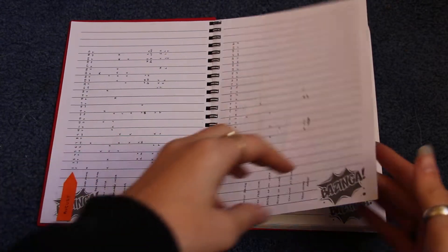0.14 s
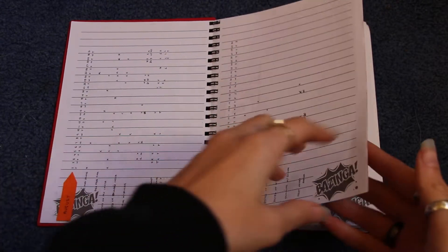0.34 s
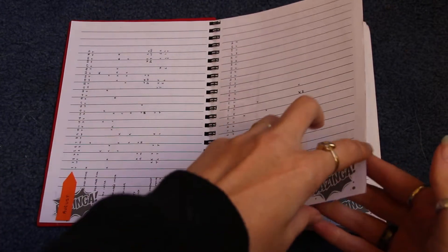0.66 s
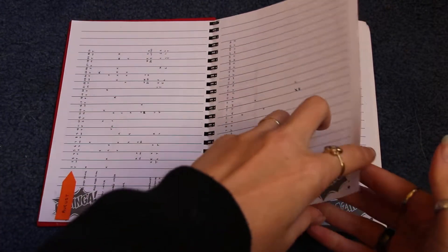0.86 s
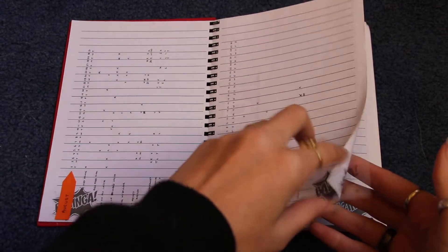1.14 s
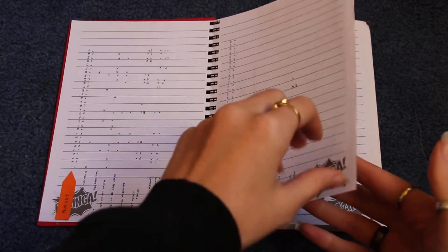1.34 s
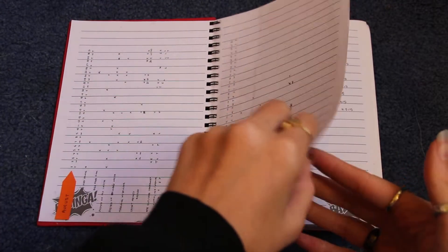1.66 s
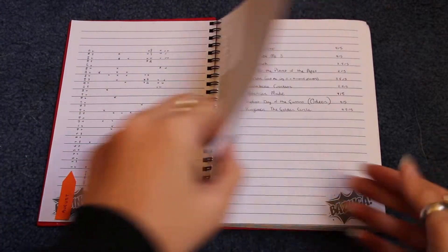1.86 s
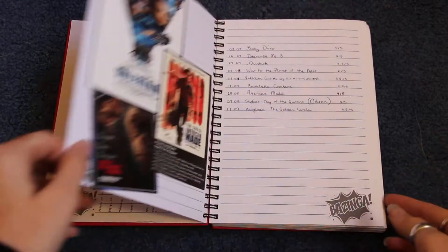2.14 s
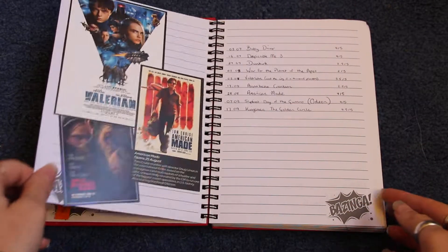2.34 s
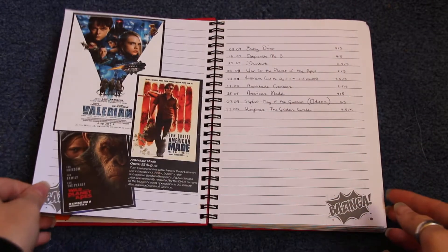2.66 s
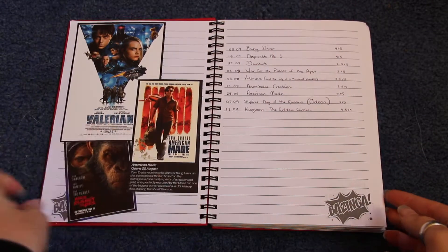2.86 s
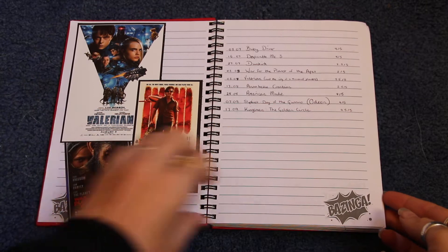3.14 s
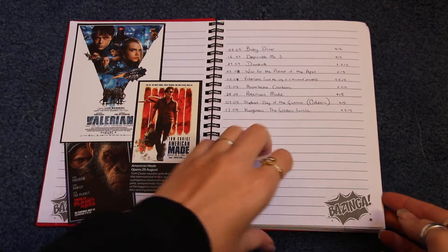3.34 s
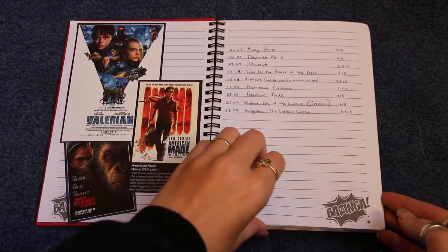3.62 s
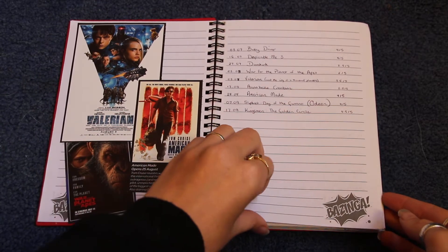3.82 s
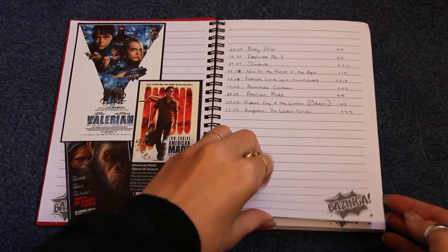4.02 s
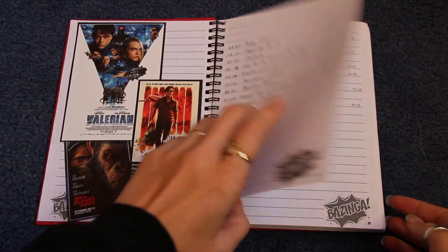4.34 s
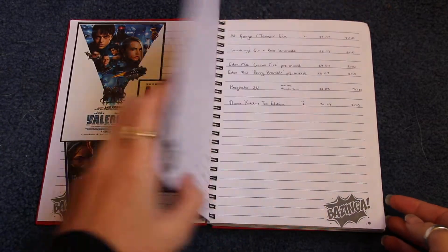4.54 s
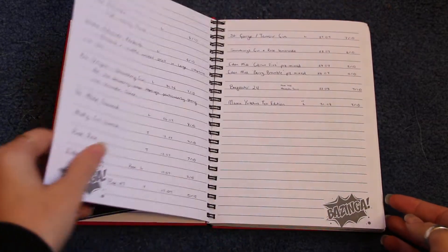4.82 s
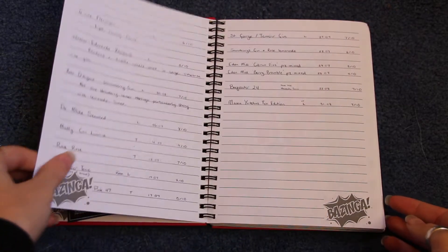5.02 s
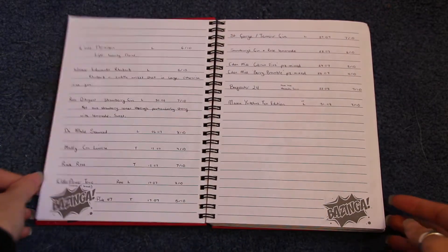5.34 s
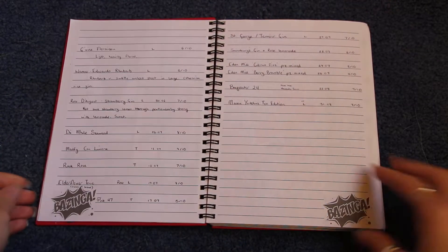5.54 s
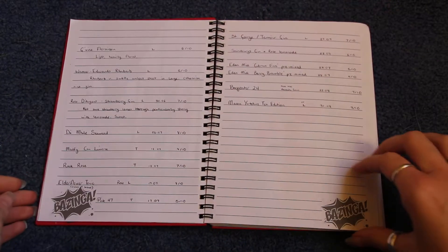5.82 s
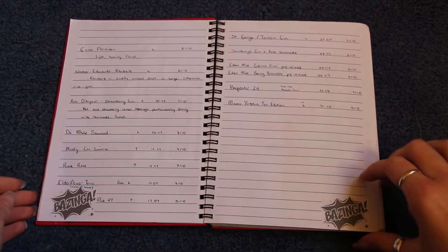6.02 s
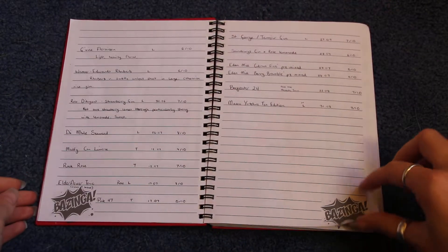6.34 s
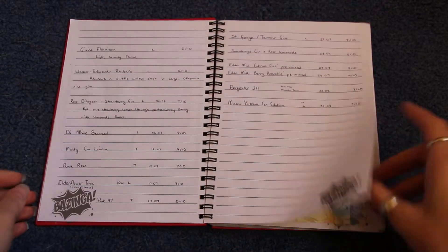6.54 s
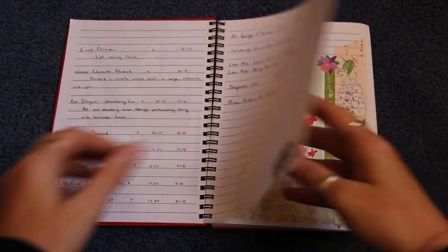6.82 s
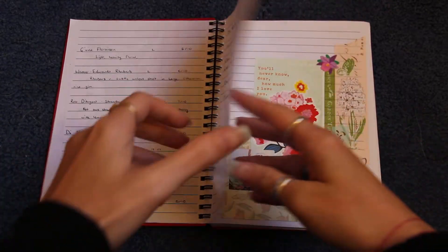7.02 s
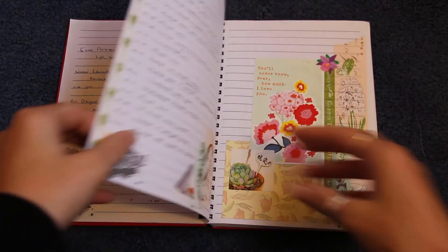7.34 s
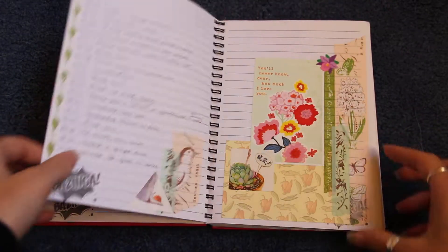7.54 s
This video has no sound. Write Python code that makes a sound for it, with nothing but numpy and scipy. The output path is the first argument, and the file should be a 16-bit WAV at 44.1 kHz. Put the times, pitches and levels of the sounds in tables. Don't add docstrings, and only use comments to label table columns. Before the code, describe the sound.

Close papery swishes, crackles and crisp flaps of three turning notebook sheets, over steady low hum and soft microphone hiss.

```python
import sys
import numpy as np
from scipy import signal
from scipy.fft import rfft, irfft
from scipy.io import wavfile
from scipy.ndimage import uniform_filter1d

SR = 44100
rng = np.random.default_rng(int(sys.argv[2]) if len(sys.argv) > 2 else 0)


def int16_out(signal):
    q = np.round(np.clip(np.atleast_2d(signal).T, -1, 1) * 32767)
    wavfile.write(sys.argv[1], SR, q.astype(np.int16))


def voltage_ratio(level):
    return 10 ** (np.asarray(level, float) / 20)


N = 338247

# frequency_hz, density_db
FLOOR_SPECTRUM = [(15, -58), (33, -21.5), (64, -13), (96, -4.5), (144, -8.5), (188, -6), (349, -11.5),
                  (804, -11.5), (895, -13.5), (970, -13), (1850, -16.5), (5140, -22.5), (15500, -35)]
# frequency_hz, likeness (-1 to 1)
FLOOR_LIKENESS = [
    (28, -0.1),
    (60, 0.88),
    (180, 0.016),
    (550, -0.24),
    (1650, -0.46),
    (4970, -0.3),
    (15000, -0.1),
]
# centre_hz, width_hz, level_db
MOTOR_RUMBLE = [
    (95, 26, -80),
    (176, 33, -76.5),
]

# low_hz, high_hz, grain_share (0-1), trim_db, stereo_width (0-1)
RUB_BANDS = [
    (300, 760, 0.02, -4, 0.2),
    (900, 2650, 0.26, 0, 0),
    (2150, 5970, 0.28, -2, 0.5),
    (5800, 12500, 0.14, -10, 1),
]
# peak_s, rise_s, fall_s, peak_db, brightness_db
PAGE_SLIDES = [(.088, 0.29, 0.15, -58.5, 1), (.58, 0.11, 0.022, -63, -6), (.63, .04, 0.17, -60.5, -1),
               (.864, 0.082, 0.023, -59, -8), (1.116, .4, 0.11, -62, 9),
               (1.186, 0.096, .02, -45.5, 6.5), (1.2, 0.012, 0.043, -32.5, -11.5),
               (1.533, .006, 0.034, -50, 12.5), (1.655, 0.17, 0.24, -52.5, -1),
               (1.757, .1, .03, -65, 1), (1.83, 0.087, 0.33, -67, -1), (1.99, 0.43, 0.14, -62.5, 8),
               (2.172, 0.52, 0.12, -63.5, 4), (2.23, 0.15, .03, -53.5, 1),
               (2.266, 0.035, 0.13, -48.5, 5.5), (2.498, 0.26, 0.021, -58.5, -2),
               (2.644, 0.1, 0.15, -53.5, 3.5), (2.84, 0.14, 0.04, -43, 6),
               (2.87, 0.12, 0.016, -52, 26),
               (3.368, 0.019, 0.023, -66, 16), (3.444, 0.029, 0.13, -54, -3),
                      (3.58, .15, 0.024, -56.5, -7), (4.044, 0.19, 0.098, -59.5, 7),
                      (4.185, 0.094, 1, -57.5, 7), (4.357, 0.019, .2, -56, 15),
                      (4.405, 0.085, 0.13, -52.5, 4), (4.535, 0.033, 0.029, -50.5, 6),
                      (4.6, .15, 0.084, -75, 13), (4.72, 0.066, 0.073, -53.5, -4),
                      (4.754, 0.011, 0.057, -59, 2), (4.871, 0.14, 0.15, -59.5, 4),
                      (5.0, 0.13, 0.15, -55, -9), (5.06, 0.28, 0.28, -54, -2),
                      (5.198, 0.45, 0.12, -49.5, 12.5), (5.33, 0.31, 0.07, -50, 15),
               (5.584, 0.15, 0.53, -59, 6), (5.727, 0.18, 0.75, -66, -6),
                     (5.874, 0.055, 0.091, -57, 0), (6.02, 0.05, 0.073, -57.5, -5),
                     (6.238, 0.089, 0.028, -61.5, -4), (6.316, 0.0053, 0.15, -58, -3),
                     (6.41, 0.021, 0.21, -60.5, 18), (6.456, 0.051, 0.011, -46, 12),
                     (6.574, 0.1, 0.3, -61, 15), (6.8, 0.04, 0.16, -57, 0), (6.858, .012, .045, -49, -8),
                     (6.89, 0.11, 0.31, -64.5, -7), (7.145, 0.18, 0.3, -56, 4),
                     (7.232, 0.073, 0.17, -61, -12), (7.298, 0.075, 0.021, -54.5, 0),
                     (7.44, .1, 0.018, -68, 6), (7.509, 0.054, 0.063, -48.5, -8),
                     (7.568, 0.045, 0.18, -49.5, 0), (7.66, .1, .1, -67, 2)]
# peak_s, rise_s, fall_s, peak_db
PAGE_BENDS = [(.088, 0.27, .15, -64), (.582, 0.18, 0.018, -55), (.914, .02, .35, -59),
              (1.196, 0.012, 0.029, -35), (1.535, 0.0091, 0.031, -40), (1.615, 0.089, .3, -55),
              (1.757, .3, .03, -59), (1.811, 0.09, 0.15, -57), (2.019, 0.03, 0.023, -49),
              (2.28, .05, 0.54, -56.5), (2.528, 0.079, 0.12, -49.5), (2.84, .13, .06, -61),
              (3.368, 0.022, 0.016, -50.5), (3.45, .08, .3, -66), (3.58, 0.22, .03, -50),
                    (4.185, 0.07, 1.2, -57), (4.405, 0.12, 0.092, -56), (4.535, 0.018, 0.08, -51),
                    (4.72, 0.075, 0.11, -45.5), (4.99, 0.082, 0.03, -43), (5.964, 1, .02, -53.5),
                    (6.02, .1, 0.2, -54.5), (6.238, .2, 0.011, -59), (6.458, 0.06, 0.035, -54),
                    (6.81, 0.036, 0.11, -50.5), (7.158, 0.016, 0.1, -46.5), (7.232, .03, 0.15, -45.5),
                    (7.298, 0.22, 0.064, -54), (7.41, 0.12, 0.11, -52.5), (7.51, 0.063, 0.087, -55),
                    (7.66, .3, .2, -51)]
# peak_s, rise_s, fall_s, peak_db
FINGER_WIPES = [(1.192, 0.014, .012, -39), (1.99, .3, .06, -64), (2.25, .3, 0.25, -57),
                (3.9, 0.72, 0.54, -67.5), (4.629, .06, .08, -52), (4.78, 0.21, 0.28, -61),
                (5.145, .01, 0.4, -48), (5.33, 0.27, 0.053, -47), (5.726, 0.15, 0.55, -56),
                (6.404, 0.007, 0.06, -40), (6.458, 0.077, 0.013, -43), (7.136, .15, .05, -61),
                (7.298, .06, .06, -63)]
# time_s, peak_spacing_hz, strength (0-1)
GAP_PATH = [(.95, 1550, 0), (1.02, 1580, 0.5), (1.18, 1670, 0.4), (1.2, 1720, 0), (2.3, 1300, 0),
            (2.45, 1410, 0.6), (2.8, 1370, 0.06), (3.3, 1190, 0), (4.2, 1990, 0.48), (4.5, 2280, 0),
            (4.98, 1410, 0.08), (5.358, 1430, 0.2), (5.45, 550, 0.25), (6.1, 554, 0.1), (6.3, 1600, 0),
            (6.5, 3300, 0), (6.7, 2600, 0.2), (6.9, 1410, 0.1)]

# start_s, peak_db, crease_hz, sheet_re_peak_db, sheet_hz
BUCKLES = [(.3825, -57.5, 1620, 4, 447), (0.6246, -39, 2650, -26, 630), (0.8815, -37.5, 2420, -20, 571),
           (1.211, -27, 2340, -12, 1070), (1.534, -32, 2300, -11, 1050), (1.709, -35.5, 2620, -28, 604),
           (1.746, -35, 2100, -31, 552), (4.1992, -33, 1940, -32, 316), (4.5304, -34, 3370, -16, 953),
           (4.551, -42, 3500, -14, 1100), (4.603, -44, 3500, -14, 1900), (4.6328, -48.5, 1800, 6, 1250),
           (4.6966, -36, 4250, -13, 950), (4.7102, -35, 2650, -20, 890), (6.311, -40, 2300, -31, 1180),
           (6.7975, -38, 5500, -17, 406), (7.149, -31, 2920, -16, 900), (7.236, -50, 2270, 1.5, 565),
           (7.2592, -37, 3400, -16, 550), (7.292, -47.5, 1890, 5.5, 1280), (7.5435, -40, 1800, -1, 1420)]
# start_s, peak_db, crease_hz, sheet_re_peak_db, sheet_hz
POPS = [(.448, -33, 2480, -12.5, 417), (.633, -40, 2090, -12.5, 850), (1.1921, -20, 4900, -19.5, 372),
        (1.1981, -15.5, 3720, -10, 1400), (1.203, -17, 930, -23, 890), (1.2223, -34, 2270, -29, 1520),
        (1.529, -33, 1480, -17, 900), (2.2638, -35, 4980, -14, 1550), (2.8726, -31, 2400, -34, 990),
        (4.171, -33, 5300, -14, 2900), (4.178, -39, 5000, -20, 2900), (6.8461, -29, 2100, -8, 1520),
        (7.4059, -39, 4740, 1, 710), (7.4135, -31.5, 4060, -3.5, 980), (7.513, -31.5, 2000, -3.5, 1180),
        (7.5569, -28.5, 2000, -7, 1200), (7.5691, -28, 1810, -8.5, 1050), (7.5837, -28, 2400, -16, 966),
        (7.606, -31, 2100, -7.5, 1300), (1.5783, -39, 2270, -14, 1300), (1.6557, -39, 2400, -15, 1050),
        (1.6636, -37, 2350, -20, 1100), (1.693, -39, 2400, -20, 1100), (1.8931, -40, 3500, -15, 1570),
        (1.9295, -45, 2900, -25, 1500), (2.4697, -42, 2800, -12, 1410), (2.6368, -42, 3000, -15, 1500),
        (4.727, -36, 2900, -13, 900), (7.221, -39, 2000, -8, 956), (7.271, -44, 1800, -5, 783),
        (7.286, -41, 1500, -5, 700), (7.481, -39.5, 1530, -11, 900), (7.496, -46, 2700, -12, 900),
        (0.821, -43, 2300, -20, 1500), (.903, -46, 2400, -25, 1500)]
# start_s, peak_db, crease_hz, sheet_re_peak_db, sheet_hz
CRISP_SNAPS = [(0.6764, -44, 2840, -27, 1170), (1.943, -42, 2920, -10, 1060), (2.051, -38, 2840, -26, 1010),
               (2.1041, -45.5, 5220, -8, 969), (2.1878, -40, 3380, -10, 1510),
               (2.2108, -32.5, 2730, -3.5, 1250), (2.3006, -35, 2480, -13, 1360),
               (2.3552, -25, 2320, -14, 990), (4.219, -45, 8500, -31, 1100),
               (4.4875, -40.5, 3570, -11, 1300), (4.5194, -41, 4500, -8, 2400),
               (4.5773, -48, 3160, -21, 900), (4.6151, -36, 2980, -26, 1040),
               (4.756, -28.5, 2300, -35, 1370), (4.8084, -25, 2780, -27, 1160),
               (4.9434, -23, 3300, -12, 1290), (6.4, -38.5, 1800, -14, 1570), (7.654, -44, 2870, -2, 950)]
CRACK_LEVELS = [
    -7,
    -18,
    -29,
]
SPRAY_RATIOS = [
    0.35,
    0.38,
    0.54,
]
# start_s, peak_db, mode_hz, width_hz
SHEET_MODES = [(0.3819, -41, 1530, 150), (.448, -39, 1300, 350), (1.192, -26, 4870, 500),
               (1.1925, -36, 8500, 500), (1.1985, -19, 3830, 250), (1.1985, -22, 4450, 250),
               (1.1983, -26, 370, 90), (1.222, -24, 2340, 250), (1.203, -26, 1060, 230),
               (1.534, -36, 1110, 150), (1.532, -39, 1600, 150), (1.534, -35.5, 2450, 300),
               (2.2102, -26.5, 1250, 350), (2.19, -35, 2500, 300), (2.211, -29, 2660, 400),
               (2.3556, -23, 2980, 600), (2.361, -30, 1620, 300), (2.357, -32, 560, 200),
               (2.357, -18, 2360, 220), (2.357, -23.5, 1500, 200), (2.357, -29, 950, 150),
               (2.357, -39, 3540, 250), (2.873, -32, 2310, 250), (4.577, -38, 3200, 300),
               (4.6335, -40, 1250, 260), (4.697, -26, 4830, 350), (4.696, -39, 4260, 250),
               (4.694, -32, 2100, 500), (4.712, -36, 650, 250), (4.757, -38.5, 2550, 200),
               (4.809, -27.5, 1040, 170), (4.809, -20, 1580, 300), (4.8093, -18, 2800, 350),
               (4.8096, -27, 2570, 350), (4.8093, -23.5, 2020, 300), (4.809, -15.5, 4330, 350),
               (4.809, -21, 4900, 400), (4.809, -20, 9200, 900), (4.9434, -13.5, 2460, 2600),
               (4.9433, -20.5, 6140, 2000), (4.9428, -24, 1560, 260), (4.9435, -24, 2800, 350),
               (4.9465, -21.5, 1490, 220), (4.945, -25.5, 1000, 300), (4.9432, -34, 3550, 300),
               (4.9432, -30, 4260, 300), (6.846, -37.5, 1420, 250), (6.849, -36, 1780, 150),
               (6.846, -33, 2470, 360), (7.406, -35, 4900, 500), (7.406, -30.5, 965, 150),
               (7.414, -37, 4760, 600), (7.655, -37.5, 950, 250), (7.291, -33.5, 1400, 300),
               (7.237, -39, 800, 400)]
# peak_s, rise_s, fall_s, peak_db, pitch_hz
AIR_POCKETS = [(1.03, .05, .05, -64, 4580), (1.04, .05, .04, -61, 1650), (1.125, .015, 0.2, -54, 1800),
               (1.13, .02, .1, -63, 4900), (1.17, .1, .03, -59, 3100), (1.18, .15, .03, -57, 8300),
               (1.63, 0.1, .05, -58, 1230), (1.665, .03, .1, -53, 2420), (1.73, .06, 0.11, -59, 2700),
               (2.47, 0.089, .04, -62, 1410), (2.55, .06, .05, -57, 867), (2.63, 0.079, 0.16, -53.5, 1410),
               (2.83, 0.12, .06, -46.5, 1470), (2.68, .08, .05, -62, 4150), (2.84, .06, .03, -55, 5480),
               (4.27, 0.11, 0.086, -55, 2440), (4.36, .04, .05, -58, 2500), (4.41, .08, .05, -56, 2120),
               (4.39, .08, .06, -60, 3900), (4.37, .04, .06, -57, 4800), (5.07, 0.11, .05, -53, 5500),
               (5.25, .2, 0.14, -58, 2870), (5.3, 0.15, .08, -51, 5400), (5.2, .15, .06, -56, 4050),
               (5.18, .08, .1, -58, 7400), (5.04, .1, .15, -57, 1650), (6.43, 0.054, .05, -51.5, 1520),
               (6.605, .12, .04, -58, 3150), (6.66, .08, .12, -62, 2400), (6.55, .08, .06, -60, 3660),
               (7.14, .08, .06, -58, 2270), (7.62, 0.065, 0.036, -49.5, 2500)]
# start_s, peak_db, decay_s
LANDINGS = [(1.535, -44.5, 0.024), (2.179, -51, 0.05), (2.356, -43.5, 0.028), (1.197, -53, 0.037),
            (2.521, -58, 0.084), (2.855, -52.5, 0.046), (4.7, -54, .05), (4.945, -52.5, 0.036),
            (5.376, -52, 0.066), (5.989, -49.5, 0.073), (6.859, -55, 0.044), (7.288, -51, 0.04)]

# delay_s, left_db, right_db
EARLY_ECHOES = [
    (.00097, -12, -13),
    (.0047, -17, -16),
    (.0102, -11, -12),
    (.0190, -16, -17),
]
# low_hz, high_hz, t60_s, level_db
ROOM_DECAY = [
    (245, 555, 0.15, 5.5),
    (720, 4100, 0.11, 6.5),
    (2600, 12400, 0.13, 7.5),
    (6960, 22000, 0.14, 2),
]


def rms_one(x):
    return x / np.sqrt(np.mean(x ** 2) + 1e-20)


def at_hz(points, hz):
    points_hz, values = np.transpose(points)
    return np.interp(np.log(hz), np.log(points_hz), values)


def band(x, low_hz, high_hz):
    edges_hz = [low_hz, min(high_hz, .45 * SR)]
    return signal.sosfilt(signal.butter(2, edges_hz, "band", fs=SR, output="sos"), x)


def dull(x, cut_hz):
    return signal.sosfilt(signal.butter(2, min(cut_hz, .45 * SR), fs=SR, output="sos"), x)


def resonate(x, hz, width_hz):
    r = np.exp(-np.pi * width_hz / SR)
    return signal.lfilter([1, 0, -1], [1, -2 * r * np.cos(2 * np.pi * hz / SR), r * r], x)


def stereo(mid, side):
    return mid + side * [[1], [-1]]


def drift(rate_hz):
    r = np.exp(-80 * np.pi * rate_hz / SR)
    white = rng.standard_normal(N // 40 + 2002)
    slow = signal.lfilter([1], [1, -2 * r, r * r], white)[2000:]
    return np.interp(np.arange(N) / 40, np.arange(len(slow)), rms_one(slow))


def strokes(rows, lean=0):
    edge_db = 20
    t = np.arange(0, N + 32, 32) / SR
    power = 1e-12
    for peak_s, rise_s, fall_s, peak_db, *bright_db in rows:
        away = np.where(t < peak_s, (peak_s - t) / rise_s, (t - peak_s) / fall_s)
        power = power + voltage_ratio(peak_db + lean * sum(bright_db) - edge_db * away) ** 2
    return np.interp(np.arange(N) / SR, t, power)


def floor_noise(level_db=-54.5, patchy_db=.4):
    out = 0
    edges_hz = 22 * 2 ** np.arange(0, 9.7, .4)
    white = rng.standard_normal((2, 2, N))
    for k, (low_hz, high_hz) in enumerate(zip(edges_hz, edges_hz[1:])):
        mid, side = band(white[k % 2], low_hz, high_hz)
        hz = np.sqrt(low_hz * high_hz)
        alike = at_hz(FLOOR_LIKENESS, hz)
        gain = voltage_ratio(at_hz(FLOOR_SPECTRUM, hz) + patchy_db * drift(16.0))
        out = out + gain * stereo(np.sqrt(1 + alike) * mid, np.sqrt(1 - alike) * side)
    return voltage_ratio(level_db) * rms_one(out)


def hum():
    t = np.arange(N) / SR
    out = np.zeros(N)
    for hz, level_db in [(101.2, -66), (90, -68)]:
        out += voltage_ratio(level_db + 1.3 * drift(4.5)) * np.sqrt(2) * np.sin(2 * np.pi * hz * t)
    for hz, width_hz, level_db in MOTOR_RUMBLE:
        noise = resonate(rng.standard_normal(N), hz, width_hz)
        out += voltage_ratio(level_db) * rms_one(resonate(noise, hz, width_hz))
    return out


def rubbing(grains_per_s=5100.0, clump_db=6.0, size_db=6.0):
    slides = PAGE_SLIDES
    rustle = strokes(slides, -0.39)
    swish = strokes(slides, 0.4)
    flex = strokes(PAGE_BENDS) + voltage_ratio(2 * -30) * rustle
    hiss = strokes(FINGER_WIPES) + voltage_ratio(2 * -10) * swish

    born = rng.random(N) < grains_per_s * voltage_ratio(clump_db * drift(30)) / SR
    grain_size = voltage_ratio(size_db * np.minimum(rng.exponential(1, N), 4))
    grains = born * grain_size * rng.choice([-1, 1], N)
    stutter = drift(33)
    out = 0
    for (low_hz, high_hz, share, trim_db, width), power in zip(RUB_BANDS, [flex, rustle, swish, hiss]):
        smooth, side = rms_one(band(rng.standard_normal((2, N)), low_hz, high_hz))
        creases = rms_one(band(grains + 1e-18, low_hz, high_hz))
        mid = rms_one((1 - share) * smooth + share * creases)
        flicker_db = .7 * stutter + .6 * drift(25)
        out = out + stereo(mid, width * side) * np.sqrt(power) * voltage_ratio(trim_db + flicker_db)
    return out


def air_gap(x, wobble=.025):
    time_s, spacing_hz, strength = np.transpose(GAP_PATH)
    n = np.arange(N)
    lag = SR / np.interp(n / SR, time_s, spacing_hz) * (1 + wobble * drift(5.5))
    gain = np.interp(n / SR, time_s, strength)
    out = x
    for k in range(1, 4):
        repeat = np.array([np.interp(n - k * lag, n, channel) for channel in x])
        out = out + gain ** k * repeat
    return out * np.sqrt(1 - gain ** 2)


def snap_kick(mid, side, spray, spray_s=0.0019, spread=0.23):
    size = len(mid)
    t = np.arange(size) / SR
    kick = spray * stereo(mid, spread * side) * np.exp(-t / spray_s)
    kick[:, 0] += 1
    spectrum = rfft(kick)
    flat = irfft(spectrum / np.abs(rfft(kick.mean(0))), size)
    return flat * np.exp(-t / (4 * spray_s))


def snaps(width=1.46, body_q=1.47, trim_db=-2.0, crack_db=12.0, body_db=10.0, rise_s=.0006):
    size = 1024
    out = np.zeros((2, N + size))
    for kind, kind_db, spray in zip([CRISP_SNAPS, BUCKLES, POPS], CRACK_LEVELS, SPRAY_RATIOS):
        for start_s, peak_db, crease_hz, body_rel_db, body_hz in kind:
            mid, side = rng.standard_normal((2, size))
            kick = snap_kick(mid, side, spray)
            body = resonate(kick, body_hz, body_hz / body_q)
            crack_level_db = kind_db + crack_db
            parts = [(0, -band(kick, crease_hz / width, crease_hz * width)),
                     (crack_level_db, -band(kick, 2100, 7800)),
                     (body_rel_db + body_db, dull(body, 1.5 * body_hz)),
                     (crack_level_db - 40, band(kick, 9000, SR)),
                     (-30, band(kick, 340, 800))]
            snap = sum(voltage_ratio(level_db) * part / np.abs(part).max() for level_db, part in parts)
            i = round((start_s + rise_s) * SR)
            out[:, i:i + size] += voltage_ratio(peak_db + trim_db) * snap
    return out[:, :N]


def rings():
    out = np.zeros(N + 1024)
    click = np.eye(1, 1024)[0]
    for start_s, peak_db, hz, width_hz in SHEET_MODES:
        i = round(start_s * SR)
        ring = dull(resonate(click, hz, width_hz), 1.44 * hz)
        out[i:i + len(ring)] += voltage_ratio(peak_db) * ring / np.abs(ring).max()
    return out[:N]


def room_response(tail_db=-7.5, wall_hz=5500.0, spread=0.62, tail_delay_s=.004):
    t = np.arange(SR // 3) / SR
    mid, side = rng.standard_normal((2, len(t)))
    white = stereo(mid, spread * side)
    tail = 0
    for low_hz, high_hz, t60_s, level_db in ROOM_DECAY:
        tail = tail + band(white, low_hz, high_hz) * voltage_ratio(level_db - 60 * t / t60_s)
    tail = tail * (1 - np.exp(-(t / tail_delay_s) ** 2))
    power = np.abs(rfft(tail.sum(0))) ** 2 + 1e-9
    even = np.sqrt(uniform_filter1d(power, size=400) / uniform_filter1d(power, size=40))
    tail = irfft(rfft(tail) * even, len(t)) * (1 - np.exp(-(2 * t / tail_delay_s) ** 2))

    early = np.zeros_like(tail)
    for delay_s, left_db, right_db in EARLY_ECHOES:
        early[:, round(delay_s * SR)] = voltage_ratio(np.array([left_db, right_db]))
    tail_size = np.sqrt(np.sum(tail ** 2, axis=1, keepdims=True))
    out = voltage_ratio(tail_db) * tail / tail_size + dull(early, wall_hz)
    out[:, 0] += 1
    out[:, round(0.00152 * SR)] += 0.012
    return out


def ridges(q=7.0):
    white = rng.standard_normal(N)
    out = np.zeros(N)
    for *stroke, hz in AIR_POCKETS:
        peak_s = stroke[0]
        near = slice(round((peak_s - .5) * SR), round((peak_s + .5) * SR))
        noise = resonate(resonate(white[near], hz, hz / q), hz, hz / q)
        out[near] += np.sqrt(strokes([stroke])[near]) * rms_one(noise)
    return out


def flaps(low_hz=101.0, high_hz=235.0, rise_s=0.0027, trim_db=-4.0):
    t = np.arange(N) / SR
    envelope = 0
    for start_s, peak_db, decay_s in LANDINGS:
        age = np.maximum(t - start_s, 0)
        puff = (1 - np.exp(-age / rise_s)) * np.exp(-age / decay_s)
        envelope = envelope + voltage_ratio(peak_db + trim_db) * puff
    return envelope * rms_one(band(rng.standard_normal(N), low_hz, high_hz))


def drone(hz=545, width_hz=84, peak_s=5.7, rise_s=1, fall_s=1, peak_db=-61):
    noise = resonate(resonate(rng.standard_normal(N), hz, width_hz), hz, width_hz)
    return np.sqrt(strokes([(peak_s, rise_s, fall_s, peak_db)])) * rms_one(noise)


def scene():
    paper = snaps() + rings() + air_gap(rubbing()) + ridges()
    paper = paper * voltage_ratio(np.array([[-.4], [.4]]))
    echoed = signal.fftconvolve(paper, room_response(), axes=1)[:, :N]
    return echoed + flaps() + floor_noise() + hum() + drone()


def low_pass(x):
    return signal.sosfilt(signal.butter(12, 15860, fs=SR, output="sos"), x)


def record(dry):
    return low_pass(dry)


dry = scene()
out = record(dry)
int16_out(out)
```